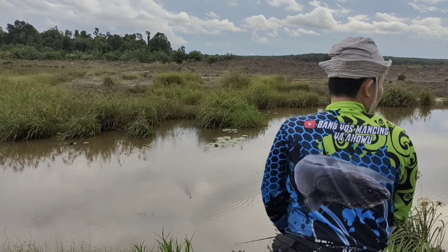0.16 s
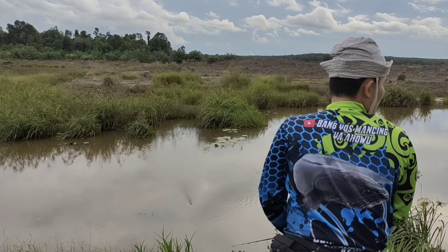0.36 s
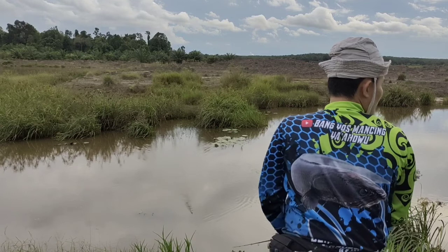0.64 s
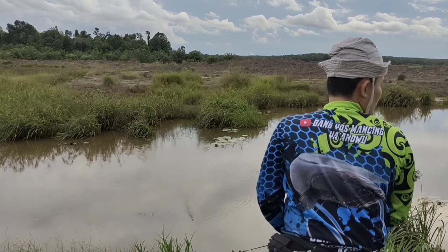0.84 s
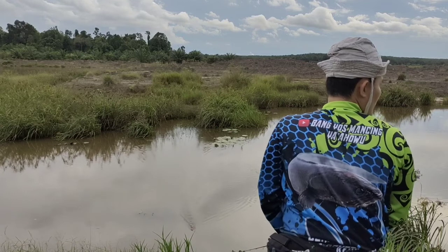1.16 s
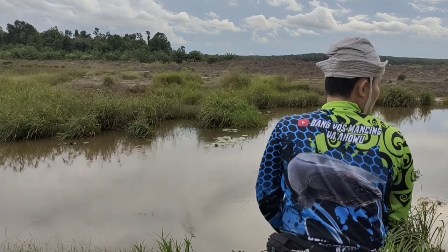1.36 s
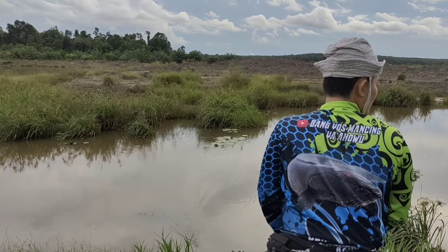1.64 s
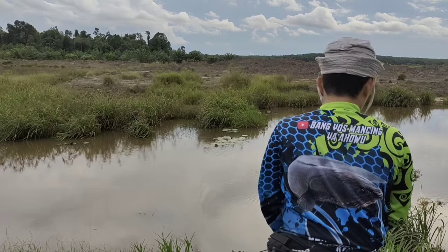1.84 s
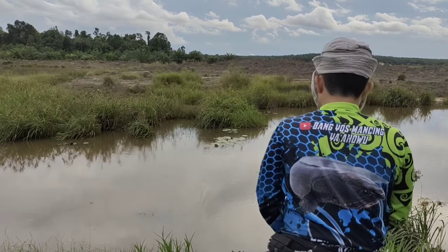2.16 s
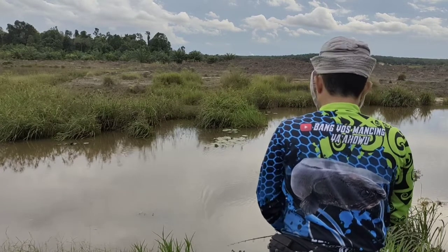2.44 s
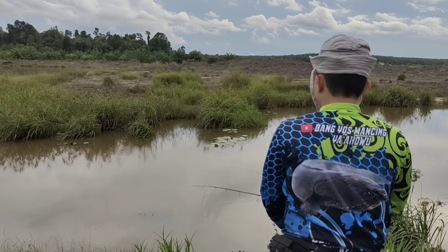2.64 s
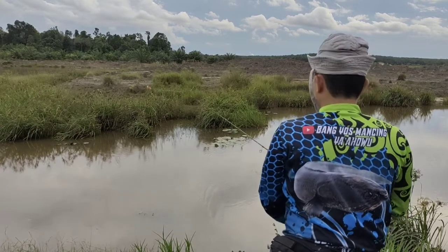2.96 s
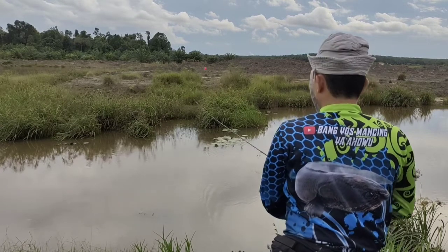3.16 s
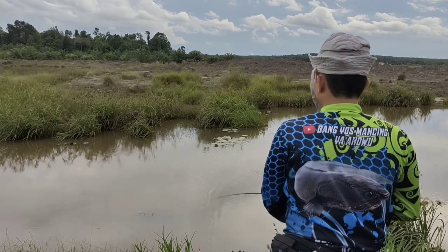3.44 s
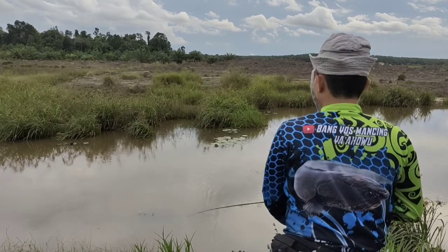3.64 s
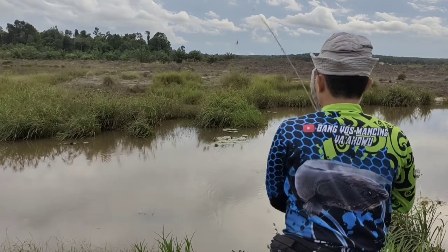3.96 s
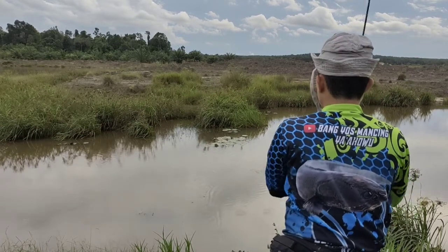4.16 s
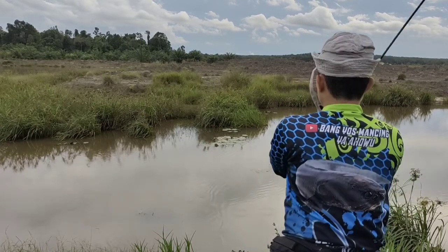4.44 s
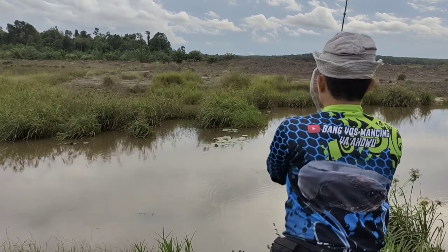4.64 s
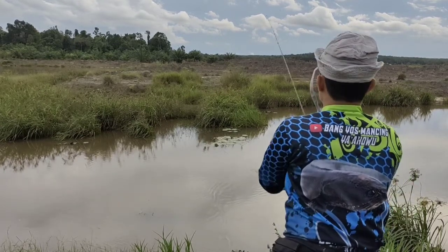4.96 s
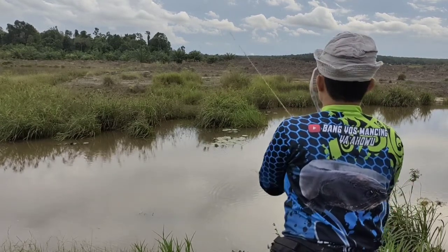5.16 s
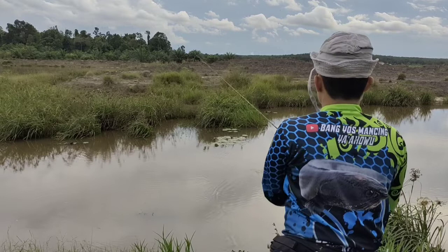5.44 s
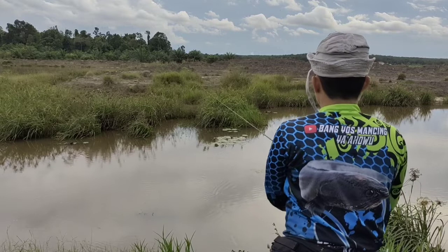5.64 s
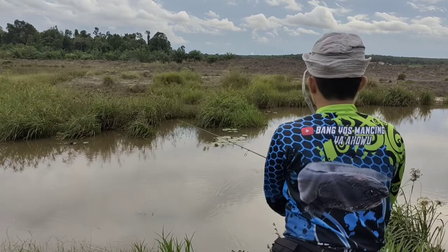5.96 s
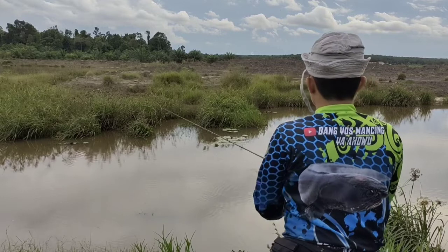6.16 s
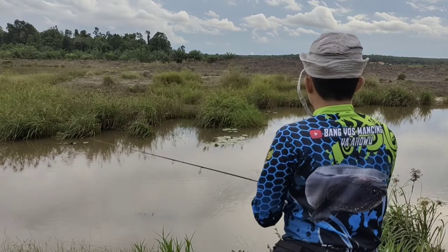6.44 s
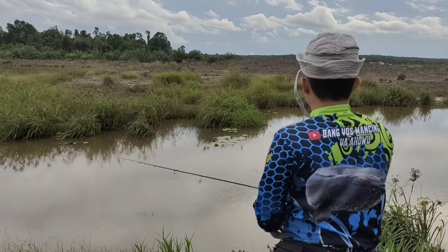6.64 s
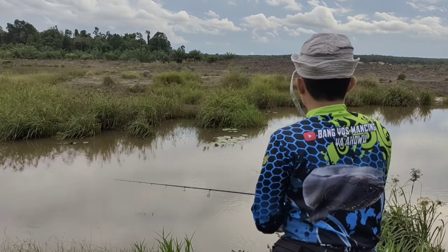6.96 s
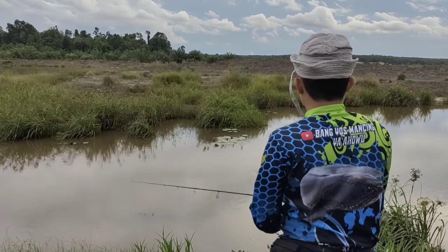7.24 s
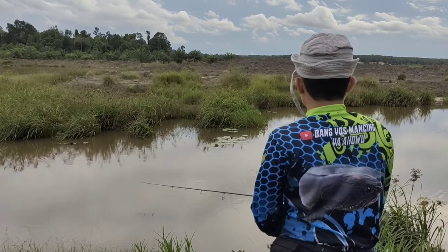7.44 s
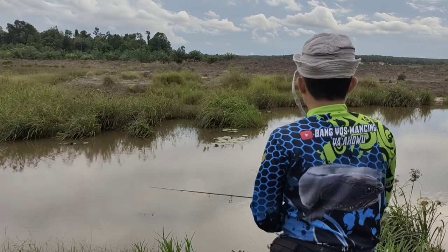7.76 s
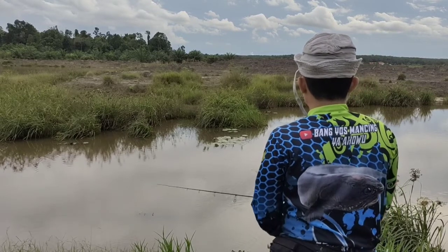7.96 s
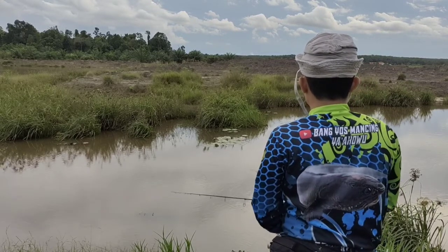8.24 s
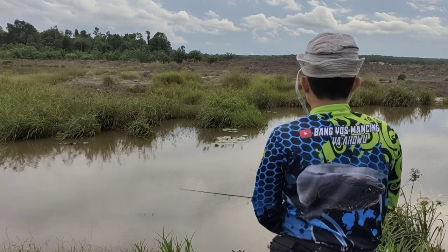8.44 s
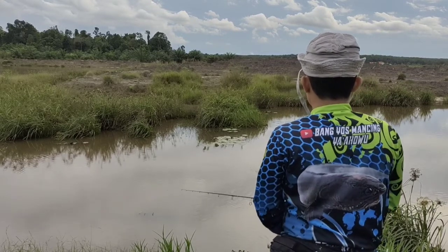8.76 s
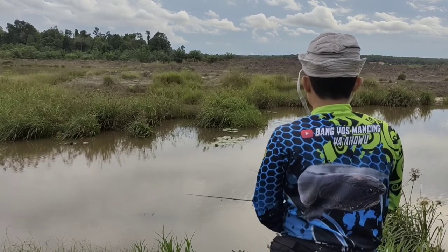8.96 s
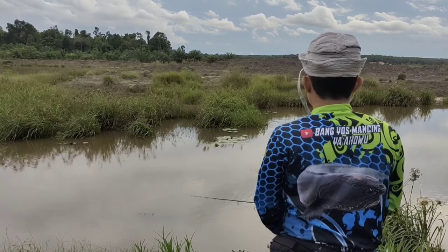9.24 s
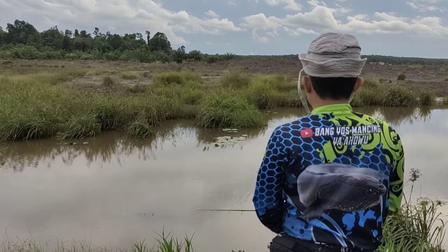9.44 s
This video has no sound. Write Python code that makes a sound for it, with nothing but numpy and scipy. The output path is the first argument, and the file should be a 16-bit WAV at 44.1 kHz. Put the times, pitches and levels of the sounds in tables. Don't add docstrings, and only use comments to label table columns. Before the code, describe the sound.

Wind buffets the microphone in low, uneven thumps over a steady high insect shimmer, while small birds whistle and chatter across an open marsh.

```python
import sys
import numpy as np
from scipy import signal
from scipy.fft import rfft, irfft, next_fast_len
from scipy.io import wavfile
from scipy.ndimage import uniform_filter1d

SR = 44100
rng = np.random.default_rng(int(sys.argv[2]) if len(sys.argv) > 2 else 0)


def undo_db(level):
    steps = np.asarray(level, float) / 20
    return 10 ** steps


def inscribe(sig):
    pcm = np.round(np.clip(np.atleast_2d(sig).T, -1, 1) * 32767)
    wavfile.write(sys.argv[1], SR, pcm.astype(np.int16))


N = 422919

LEFT_LAG = 22


def rms_one(x):
    return x / np.sqrt(np.mean(x ** 2) + 1e-20)


def in_time(rows):
    s, *columns = np.transpose(rows)
    return [np.interp(np.arange(N) / SR, s, c) for c in columns]


def band(x, low_hz, high_hz, order=2):
    edges_hz = [low_hz, min(high_hz, .45 * SR)]
    return signal.sosfilt(signal.butter(order, edges_hz, "band", fs=SR, output="sos"), x)


def drift(rate):
    knots = rng.standard_normal(N // 40 + 2)
    return np.interp(np.arange(N) * rate / SR, np.arange(len(knots)), knots)


def add(track, s, sound):
    i = round(s * SR)
    track[i:i + len(sound)] += sound[:N - i]


def swell(length, edge, top=0.31):
    u = np.linspace(0, 1, max(round(length * SR), 8))
    skew = np.log(.5) / np.log(np.clip(top, .1, .9))
    return u, np.sin(np.pi * u ** skew) ** edge


def late(x):
    return np.array([np.roll(x, LEFT_LAG), x])


def glides(notes, edge, top, early, third_db=-120):
    out = np.zeros(N)
    for s, length, start_hz, end_hz, level_db in notes:
        u, shape = swell(length, edge, top)
        way = np.interp(u, [0, .5, 1], [0, early, 1])
        way = uniform_filter1d(way, len(u) // 3, mode="nearest")
        hz = start_hz + (end_hz - start_hz) * way
        phase = 2 * np.pi * np.cumsum(hz) / SR
        third = undo_db(third_db) * np.sin(3 * phase) * (hz < 4000)
        add(out, s, undo_db(level_db + 6.0) * shape * (np.sin(phase) + third))
    return out


def trills(rows):
    sweeps_per_s, throat_hz, throat_width_hz = 50, 3250, 1100
    out, hurry, wobble = np.zeros(N), drift(60), drift(220)
    for s, length, start_hz, end_hz, warble_hz, level_db in rows:
        u, shape = swell(length, edge=.3, top=.62)
        at = np.minimum(round(s * SR) + np.arange(len(u)), N - 1)
        turn = 2 * np.pi * np.cumsum(sweeps_per_s * (1 + .3 * hurry[at])) / SR
        swing = .13 * wobble[at] - .4 * np.cos(turn)
        hz = start_hz + (end_hz - start_hz) * u + warble_hz * swing
        loud = undo_db(2.5 * np.sin(turn) + 4 * wobble[at[::-1]])
        loud = loud * undo_db(-6 * ((hz - throat_hz) / throat_width_hz) ** 2)
        tone = np.sin(2 * np.pi * np.cumsum(hz) / SR)
        add(out, s, undo_db(level_db + 7.5) * loud * shape * tone)
    return out


def scatter(x, t60_s, onset_s):
    t = np.arange(round(.7 * SR)) / SR
    echoes = rng.standard_normal((2, len(t))) * undo_db(-60 * t / t60_s) * np.clip(t / onset_s, 0, 1)
    clumps_per_s, clumps_db = 30, 5
    echoes = echoes * undo_db(clumps_db * drift(clumps_per_s)[:len(t)])
    echoes = echoes / np.sqrt(np.sum(echoes ** 2, axis=1, keepdims=True))
    return signal.fftconvolve(x[None], echoes)[:, :N]


def air():
    # f/Hz, level/dB per Hz
    density = [(30, -108), (60, -78), (120, -76), (200, -80.5), (300, -92), (500, -89.5), (800, -95.5),
               (1050, -102), (2000, -101), (4100, -105), (5600, -113), (8600, -104), (11000, -111),
               (15500, -110)]
    # f/Hz, left-right likeness 0-1
    coherence = [(60, 1), (130, 0.9), (300, 0.86), (550, 0.54), (850, 0.048), (1050, 0.05), (2000, 0.33),
                 (4000, 0.033)]
    ahead_below_hz = 850
    size = next_fast_len(N)
    hz = np.maximum(np.fft.rfftfreq(size, 1 / SR), 1)
    knot_hz, likeness = np.transpose(coherence)
    alike = np.clip(np.interp(np.log(hz), np.log(knot_hz), likeness), 0, 1)
    knot_hz, density_db = np.transpose(density)
    gain = undo_db(np.interp(np.log(hz), np.log(knot_hz), density_db)) * np.sqrt(SR / 2)
    shared, own = rfft(rng.standard_normal(size)), rfft(rng.standard_normal((2, size)))
    lags = np.array([[LEFT_LAG], [0]])
    delay = np.exp(-2j * np.pi * hz * (hz > ahead_below_hz) * lags / SR)
    spectrum = gain * (np.sqrt(alike) * shared * delay + np.sqrt(1 - alike) * own)
    return irfft(spectrum, size)[:, :N]


def chorus():
    # f/Hz, width/Hz
    song_bands = [(7735, 85), (7440, 220), (7950, 400), (8350, 500), (9000, 1000), (15300, 500)]
    # left level/dB, right level/dB
    band_levels = [(-59, -67), (-69, -71), (-64.5, -65.5), (-120, -73), (-78.5, -72.5), (-84.5, -80)]
    out = np.zeros((2, N))
    for (hz, width), (left_db, right_db) in zip(song_bands, band_levels):
        noise = rms_one(band(rng.standard_normal((2, N)), hz - width / 2, hz + width / 2))
        out += noise * undo_db([[left_db], [right_db]]) * undo_db(0.78 * drift(11.0))
    return out


def insect(chirps, stroke, song):
    start_hz, end_hz, per_s, left_db, right_db, octave_db = song
    cycle = (in_time(chirps)[0] - stroke[0] + 0.024 * drift(9)) % 1
    u = np.clip(cycle / (stroke[1] - stroke[0]), 0, 1)
    gate = np.sin(np.pi * u) ** .3
    hz = start_hz + (end_hz - start_hz) * u + 50 * drift(150)
    phase = 2 * np.pi * np.cumsum(hz) / SR
    beat = np.cumsum(per_s * (1 + 0.0593 * drift(20))) / SR
    pulses = np.abs(np.sin(np.pi * beat)) ** 1.2 * undo_db(2.1 * drift(120) + 1.1 * drift(3.19))
    tone = np.sin(phase) + undo_db(octave_db) * np.sin(2 * phase)
    return late(gate * pulses * tone)[::-1] * undo_db([[left_db], [right_db]])


def near_insects():
    # t/s, chirps so far
    slow_chirps = [(0, .41), (.5, 4.52), (1.01, 9.21), (2.52, 21.94), (5.05, 42.56), (8.08, 68.47),
                   (9.59, 81.06)]
    quick_chirps = [(0, -.3), (.25, 2.85), (.75, 8.68), (1.75, 20.8), (2.52, 30.3), (4.75, 57.46),
                    (5.55, 67.3), (6.56, 79.05), (8.08, 97.08), (8.58, 103.38), (9, 108.15), (9.59, 114.6)]
    slow_song = (7090, 7500, 150, -50.5, -81, -23)
    slow_return = (7952, 8450.5, 148.5, -69.5, -62, -34)
    quick_song = (7328, 7562.5, 159, -51, -63, -17)
    near = insect(slow_chirps, (-.24, .32), slow_song)
    near = near + insect(slow_chirps, (.42, .92), slow_return)
    return near + insect(quick_chirps, (-.28, .24), quick_song)


def drops():
    # t/s, length/s, start f/Hz, end f/Hz, level/dB
    plinks = [
        (.72, .024, 1100, 1350, -73),
        (.775, 0.027, 845, 1350, -71),
        (1.028, 0.012, 1120, 1420, -69),
        (1.265, .014, 1790, 1850, -69),
        (1.683, 0.024, 1050, 1630, -69),
        (6.26, 0.011, 1480, 1600, -65),
        (6.327, 0.017, 800, 925, -61.5),
    ]
    return glides(plinks, edge=0.074, top=0.17, early=0.51)


def tackle():
    # t/s, length/s, low f/Hz, high f/Hz, level/dB
    swishes = [
        (4.682, 0.13, 4500, 15000, -72),
        (5.919, 0.018, 600, 2200, -62),
    ]
    out = np.zeros(N)
    for s, length, low_hz, high_hz, level_db in swishes:
        shape = swell(length, edge=0.55)[1]
        noise = rms_one(band(rng.standard_normal(SR // 4), low_hz, high_hz))
        add(out, s, undo_db(level_db) * shape * noise[-len(shape):])
    return out


def flock():
    # t/s, length/s, number of notes, level/dB
    bursts = [
        (.2, 1, 55, -70),
        (4.42, .1, 4, -78),
        (5.05, 1.2, 45, -71),
        (7.95, 1.55, 45, -76),
    ]
    rows = []
    for s, length, count, level_db in bursts:
        for when, long, pitch, bend, loud in rng.random((int(count), 5)):
            hz = 2000 + 1200 * pitch
            end_hz = hz + 500 * (bend - .4)
            warble_hz = 300 + 500 * long
            rows.append((s + when * length, .02 + .05 * long, hz, end_hz, warble_hz, level_db + 4 * loud))
    return trills(rows)


def warbled_song():
    # t/s, length/s, start f/Hz, end f/Hz, level/dB
    wide_trills = [
        (8.506, 0.048, 2400, 3400, -68),
        (9.038, 0.1, 2300, 3000, -68),
        (8.808, 0.067, 3200, 2940, -71.5),
    ]
    narrow_trills = [
        (.034, 0.056, 3470, 2960, -68.5),
        (9.005, .03, 2480, 2190, -65.5),
        (1.231, 0.055, 3150, 3370, -63.5),
        (7.754, 0.014, 2950, 2870, -57),
        (7.953, 0.022, 3150, 3280, -71),
        (7.996, 0.0665, 2390, 2590, -65),
        (8.198, 0.049, 2900, 2730, -71),
        (8.295, 0.025, 2330, 2960, -68),
    ]
    # t/s, length/s, start f/Hz, end f/Hz, level/dB
    chatter_strokes = [(.24, .025, 3250, 3150, -66), (.295, .035, 3350, 3380, -66),
                       (.394, .009, 2300, 1750, -70), (.454, .012, 3050, 3200, -62),
                       (.467, .014, 2950, 3250, -59), (.475, .014, 2800, 2550, -64),
                       (.487, .012, 2850, 3300, -58), (.497, .012, 3000, 3900, -64),
                       (.508, .012, 2950, 3200, -57), (.518, .012, 3250, 3450, -63),
                       (.528, .035, 3560, 3480, -64), (.53, .02, 3000, 3100, -64),
                       (.745, .011, 3100, 3400, -66), (.772, .012, 3100, 3600, -63),
                       (.8, .02, 3200, 3500, -64), (.923, .011, 2900, 3250, -59),
                       (.939, .011, 3000, 3400, -60), (.944, .008, 3600, 3900, -67),
                       (.948, .014, 3000, 2500, -62), (.958, .012, 2800, 3700, -58),
                       (.969, .012, 2800, 3800, -61), (1.04, .016, 2950, 2900, -64),
                       (1.042, .016, 3400, 3350, -66), (1.072, .02, 3400, 3250, -66),
                       (1.922, .011, 2500, 2800, -66), (1.94, .03, 2680, 2850, -64),
                       (1.963, .012, 2800, 3100, -67), (1.983, .025, 2850, 2900, -63),
                       (2.008, .025, 3100, 3380, -63), (2.035, .018, 3380, 3400, -64),
                       (2.055, .022, 3400, 3250, -58), (2.086, .014, 3380, 3330, -65),
                       (2.145, .035, 3400, 3300, -67),
                       (5.095, 0.014, 2070, 2250, -60), (5.107, 0.015, 2520, 2900, -59),
                    (5.117, 0.015, 2200, 2360, -58), (5.127, .011, 2530, 2900, -58),
                    (5.143, .008, 2800, 2450, -57), (5.148, 0.013, 3200, 3400, -59),
                    (5.163, .013, 3150, 3420, -52), (5.181, .018, 3170, 3370, -56),
                    (5.195, 0.0096, 3570, 4100, -61), (5.205, 0.02, 3030, 3740, -58),
                    (5.349, 0.014, 2500, 2800, -66), (5.362, 0.0134, 3130, 3680, -53),
                    (5.374, .014, 3100, 3650, -61), (5.374, .009, 4000, 5200, -73),
                    (5.535, .014, 2040, 2250, -60), (5.547, 0.019, 2550, 2870, -60),
                    (5.557, .014, 2100, 2350, -55), (5.566, .008, 2500, 2900, -61),
                    (5.567, .012, 3000, 3500, -60), (5.581, 0.011, 3050, 3500, -58),
                    (5.586, .012, 2150, 2900, -61), (5.599, .016, 3060, 3470, -50),
                    (5.608, .012, 2870, 4130, -59), (5.716, .011, 2500, 2750, -60),
                    (5.727, .011, 2460, 2800, -62), (5.74, .008, 2400, 2800, -62),
                    (6.04, .011, 2600, 3300, -64), (6.057, 0.013, 3000, 3630, -59),
                    (6.074, 0.011, 2830, 3760, -54.5), (6.084, .011, 3200, 2480, -64),
                    (6.093, 0.012, 2710, 3720, -54), (6.103, 0.0095, 2850, 3750, -55),
                    (8.327, .012, 2960, 3340, -53.5), (9.412, .022, 2070, 2300, -70),
                    (9.497, 0.016, 2630, 3240, -56.5), (9.515, 0.011, 2800, 3200, -63),
                    (9.551, 0.013, 3330, 2680, -54)]
    wide_warble_hz, narrow_warble_hz = 800, 393
    phrases = [(*row[:4], wide_warble_hz, row[4]) for row in wide_trills]
    phrases += [(*row[:4], narrow_warble_hz, row[4]) for row in narrow_trills]
    chatter = glides(chatter_strokes, edge=.8, top=.5, early=.6, third_db=-23)
    return trills(phrases) + chatter


def right_whistles(flicker):
    # t/s, length/s, f/Hz, level/dB
    held_notes = [(.44, 0.016, 2390, -65), (.572, 0.035, 2610, -66), (.305, 0.014, 2180, -70),
                  (.912, .02, 2350, -62.5), (4.742, .085, 3220, -53.5), (4.868, .022, 3230, -65),
                  (4.895, .032, 3220, -67), (4.95, .03, 3230, -67), (5.215, .056, 2570, -64),
                  (5.275, .05, 2580, -69), (5.265, .06, 3600, -69), (6.015, .03, 2950, -66),
                  (8.62, 0.029, 3110, -74), (9.1, 0.054, 3095, -66), (9.43, 0.022, 2850, -61)]
    # t/s, length/s, start f/Hz, end f/Hz, level/dB
    slurs = [(.018, .014, 4330, 3900, -67), (.272, .064, 3100, 2950, -55), (.337, .055, 2550, 2750, -55),
             (.675, .07, 2970, 3050, -63), (.738, .064, 3050, 2900, -54), (.978, 0.019, 2800, 3400, -55),
             (.994, .026, 3430, 3370, -58), (1.19, .03, 3020, 2980, -62), (1.215, .095, 2990, 2955, -52),
             (5.848, .085, 3080, 2960, -53), (5.15, 0.054, 2470, 2590, -54), (5.228, 0.03, 3650, 3590, -64),
             (5.381, 0.024, 5250, 4100, -61.5), (5.381, .016, 10500, 8900, -72),
             (5.4, .045, 4100, 3930, -55), (5.59, 0.066, 2320, 2480, -59), (5.62, 0.019, 3100, 3550, -52),
             (5.636, .02, 3580, 3600, -57), (5.75, .042, 2850, 3350, -55),
             (6.112, 0.027, 2850, 3570, -50.5), (7.742, 0.014, 3450, 3080, -60),
             (7.772, 0.017, 3000, 3400, -62)]
    notes = slurs + [(s, length, hz, hz, level_db) for s, length, hz, level_db in held_notes]
    return undo_db(1.5) * flicker * glides(notes, edge=.5, top=.55, early=0.802, third_db=-23)


def left_whistles(flicker):
    # t/s, length/s, start f/Hz, end f/Hz, level/dB
    slides = [(1.6, 0.086, 2370, 2240, -64), (2.55, .04, 2200, 2240, -74), (2.24, 0.052, 3040, 3140, -69.5),
              (2.625, 0.058, 3110, 2990, -65.5), (2.955, 0.052, 3150, 2980, -67),
              (4.455, .022, 2150, 1900, -66), (4.472, .045, 1900, 2250, -65), (6.735, .06, 2150, 1850, -73),
              (6.815, 0.024, 2200, 2520, -67), (6.832, 0.015, 2480, 3050, -67),
              (6.84, 0.045, 3003, 3260, -58.5), (6.885, 0.031, 3200, 2780, -69),
              (8.66, 0.126, 3600, 3720, -71), (8.525, 0.026, 2870, 3370, -66),
              (9.03, 0.057, 2680, 2700, -64), (9.125, 0.093, 3300, 3860, -73),
              (2.99, 0.026, 3240, 3560, -70)]
    return undo_db(-2) * flicker * glides(slides, edge=.6, top=.55, early=0.615)


def birds():
    right_pan_db, left_pan_db, left_bird_lag = -3, 5, 16
    flicker = undo_db(2.0 * drift(70))
    warbles, far = warbled_song(), flock()
    song = right_whistles(flicker) + warbles
    left = left_whistles(flicker)
    direct = late(song) * undo_db([[right_pan_db / 2], [-right_pan_db / 2]])
    left_pair = np.array([left, np.roll(left, left_bird_lag)])
    direct += left_pair * undo_db([[left_pan_db / 2], [-left_pan_db / 2]])
    reeds = undo_db(-1) * scatter(warbles, t60_s=.12, onset_s=.002)
    trees = undo_db(-9) * scatter(song + 2 * far + left, t60_s=0.69, onset_s=.015)
    return direct + reeds + trees


def gusts():
    # t/s, level/dB
    breeze = [(0, -58.5), (1.9, -59), (3.2, -65), (4.2, -80), (4.9, -72), (5.4, -59), (5.9, -62),
              (6.15, -82), (7.4, -73), (7.9, -52), (9.59, -63)]
    # peak t/s, half length/s, level/dB, left-right level/dB
    puffs = [(0, 0.11, -39, -5), (0.112, 0.095, -38, -1), (0.307, .05, -46, -2), (0.51, 0.046, -44, -1),
             (0.671, 0.045, -41.5, -2.5), (0.853, 0.084, -40.5, -4), (1.18, 0.23, -48, 1),
             (1.336, 0.089, -36.5, 4), (1.455, 0.099, -46, -16), (1.666, 0.13, -42.5, -13),
             (2.396, 0.034, -49.5, 14), (2.967, 0.057, -40.5, 0), (3.44, 0.08, -45, -2),
             (3.622, 0.12, -41.5, 6), (3.882, 0.025, -45.5, -10), (4.366, 0.098, -47, -5),
             (4.565, 0.14, -45.5, -4.5), (5.017, 0.04, -46, 16), (5.225, 0.088, -37.5, -10.5),
             (5.716, 0.21, -50, -0.5), (7.637, 0.13, -43, -6), (8.031, 0.022, -39, 2),
             (8.22, 0.061, -48, 1), (8.422, 0.052, -38, -1), (8.588, 0.051, -45.5, 13),
             (8.696, 0.028, -42, -18), (8.83, 0.17, -46.5, 3), (9.05, 0.1, -46.5, -16.5),
             (9.247, 0.029, -51, 11), (9.434, 0.23, -52, -5)]
    puff_fall_db, veer_db = 13, 9
    t, side = np.arange(0, N, 50) / SR, np.array([[.5], [-.5]])
    breeze_db = in_time(breeze)[0] + side * veer_db * drift(9)
    power = undo_db(2 * breeze_db[:, ::50])
    for s, half, level_db, pan_db in puffs:
        power = power + undo_db(2 * (level_db + side * pan_db - puff_fall_db * np.abs(t - s) / half))
    return [np.interp(np.arange(N) / SR, t, 10 * np.log10(p)) for p in power]


def wind():
    out = []
    for level_db in gusts():
        lumps = undo_db(4.6 * drift(45))
        noise = lumps * rng.standard_normal((2, N))
        thud = rms_one(band(noise[0], 67.6, 137.4))
        flutter = rms_one(band(noise[1], 220, 364, order=3))
        flutter_db = -26 + 0.45 * (level_db + 29.0)
        out.append(undo_db(level_db) * (thud + undo_db(flutter_db) * flutter))
    return np.array(out)


def thumps():
    # t/s, peak level/dB, width/s
    left_thumps = [(.005, -25.5, 0.0083), (.047, -28, 0.011), (.124, -22.5, 0.0068), (.233, -26, 0.013),
                   (.314, -29.5, 0.035), (1.221, -25.5, 0.016), (1.247, -26.5, 0.012), (1.28, -25, 0.0073),
                   (1.305, -25, 0.0065), (1.334, -26.5, 0.0091), (1.374, -12.5, 0.0054), (1.4, -24, 0.0044),
                   (3.353, -29.5, 0.0049), (3.394, -30, .0092), (3.42, -30.5, 0.029), (3.594, -23, 0.012),
                   (3.701, -29.5, 0.0081), (5.053, -27, 0.015), (5.088, -24.5, 0.015)]
    right_thumps = [(0.031, -26.5, 0.0054), (0.151, -25, 0.0067), (0.185, -25, 0.011),
                    (0.212, -23.5, 0.009), (0.548, -33, 0.019), (1.338, -34, 0.014), (1.39, -29, 0.035),
                    (1.421, -26, 0.0056), (1.477, -27.5, 0.01), (1.676, -38, 0.005), (3.537, -28, 0.0091),
                    (3.733, -29.5, 0.01), (4.352, -34, 0.018), (5.214, -21.5, 0.0049), (5.25, -19, 0.0053),
                    (5.319, -31, 0.021), (7.587, -30.5, 0.012), (7.607, -26, 0.0079), (7.646, -31, 0.014),
                    (8.705, -28, 0.023), (9.39, -33.5, 0.015), (4.43, -36.5, 0.013), (4.645, -33, 0.013),
                    (5.135, -33, .018), (5.241, -22, 0.0097), (7.665, -32, 0.0087), (8.235, -34, .012),
                    (9.47, -34, 0.016)]
    base_hz, turns = 87, 0.24
    out = np.zeros((2, N))
    t = np.arange(-round(.04 * SR), round(.04 * SR)) / SR
    for port, rows in enumerate((left_thumps, right_thumps)):
        for (s, peak_db, width), turn in zip(rows, rng.random(len(rows))):
            hz = base_hz + turns / width
            shape = np.exp(-np.abs(t / (0.54 * width)) ** 1.64)
            wavelet = shape * np.cos(2 * np.pi * (hz * t + turn))
            start = max(s + t[0], 0)
            skipped = round((start - s - t[0]) * SR)
            add(out[port], start, undo_db(peak_db + 0.5) * wavelet[skipped:])
    return signal.sosfilt(signal.butter(2, 45, "high", fs=SR, output="sos"), out)


def scene():
    background = air() + chorus() + near_insects()
    return background + drops() + tackle() + birds() + wind() + thumps()


def low_pass(x):
    return signal.sosfilt(signal.butter(12, 15520, fs=SR, output="sos"), x)


def record(dry):
    cut = signal.sosfilt(signal.butter(2, 42, "high", fs=SR, output="sos"), dry)
    return low_pass(cut)


dry = scene()
out = record(dry)
inscribe(out)
```